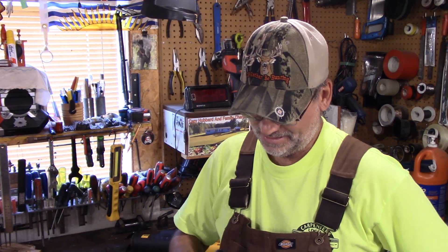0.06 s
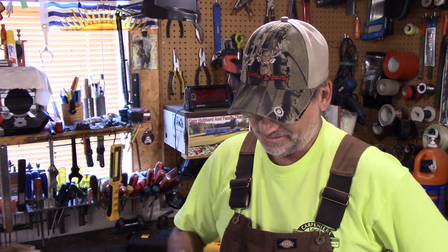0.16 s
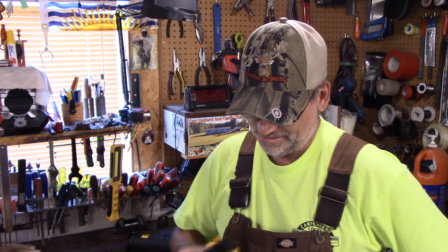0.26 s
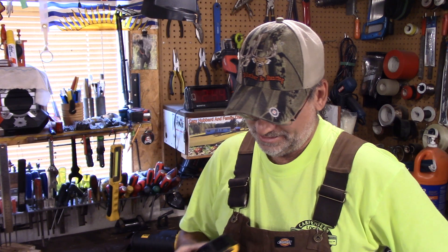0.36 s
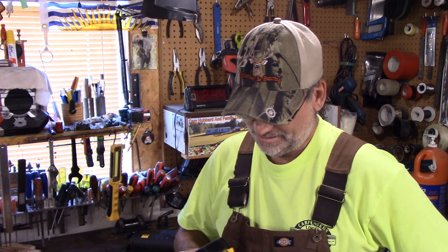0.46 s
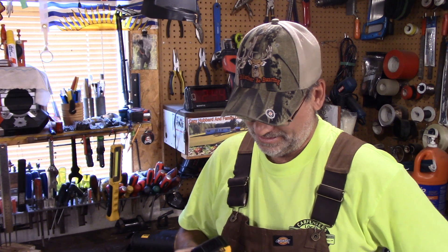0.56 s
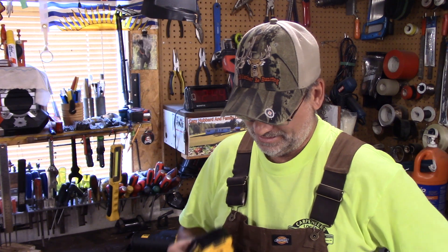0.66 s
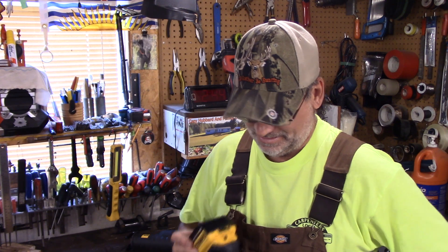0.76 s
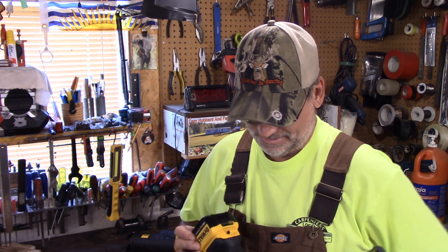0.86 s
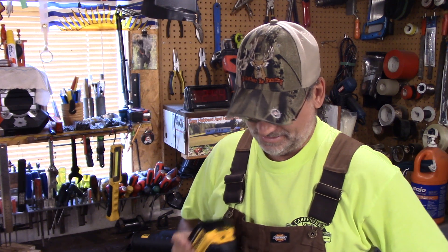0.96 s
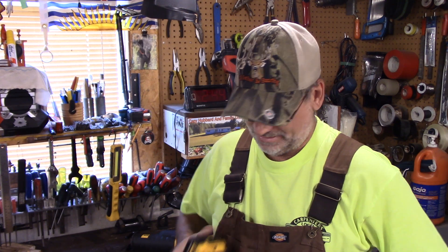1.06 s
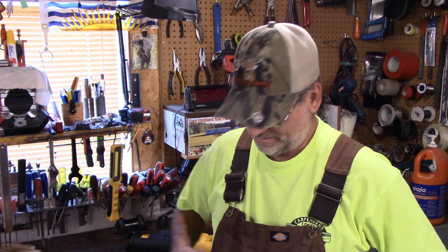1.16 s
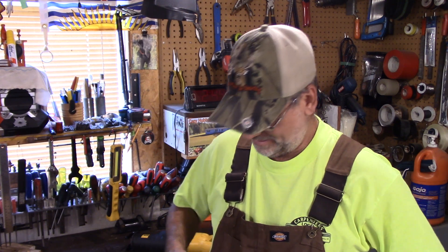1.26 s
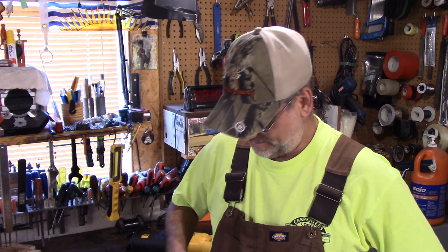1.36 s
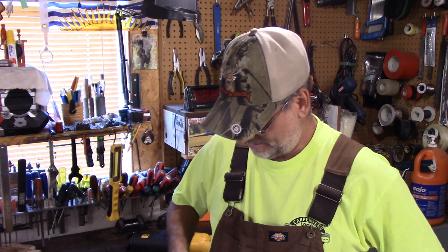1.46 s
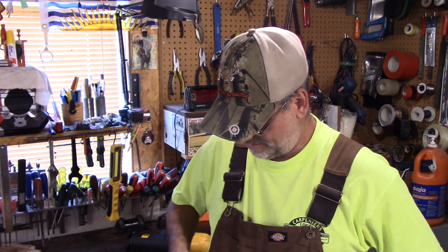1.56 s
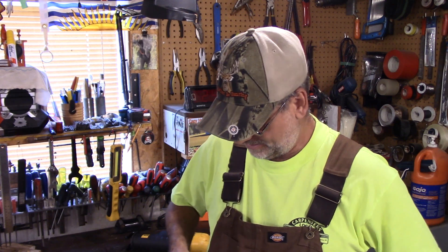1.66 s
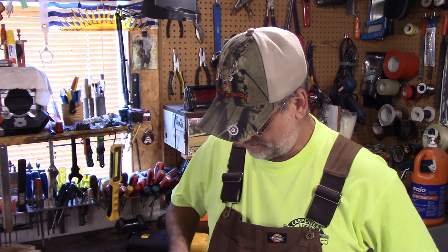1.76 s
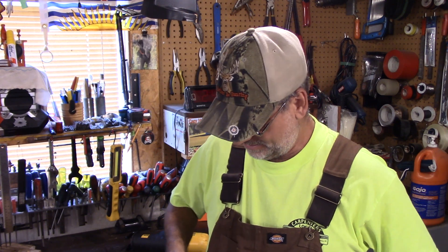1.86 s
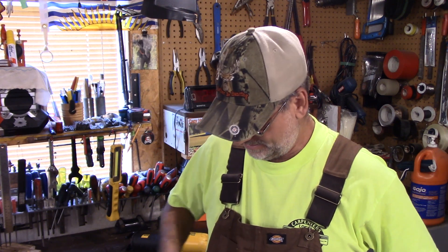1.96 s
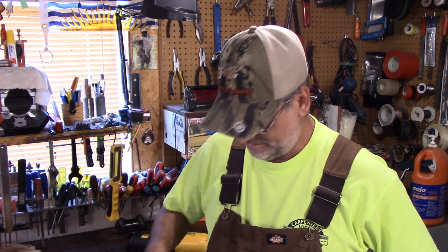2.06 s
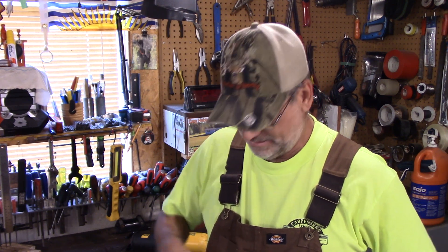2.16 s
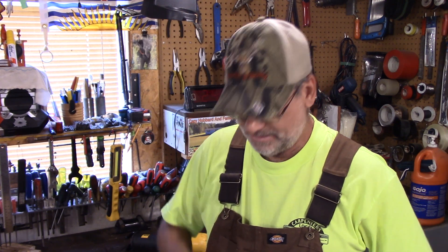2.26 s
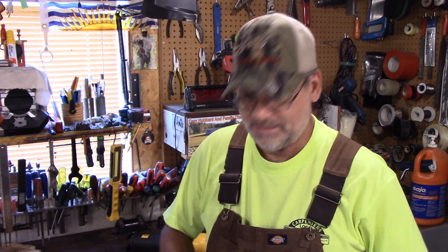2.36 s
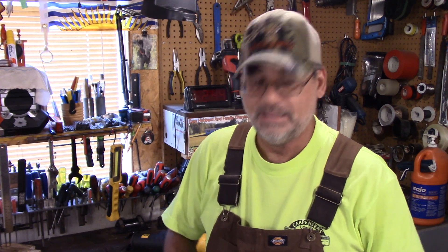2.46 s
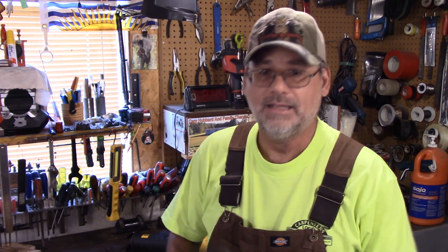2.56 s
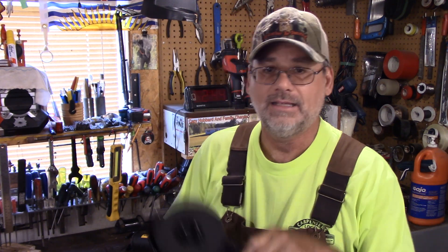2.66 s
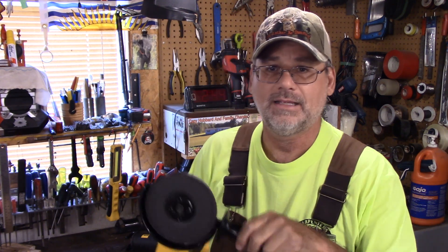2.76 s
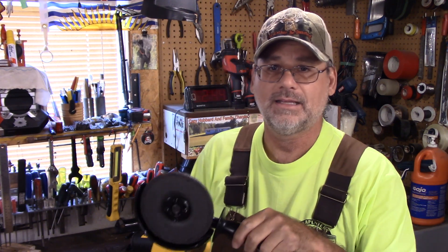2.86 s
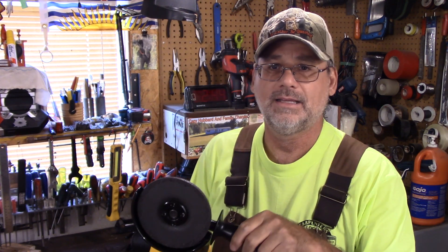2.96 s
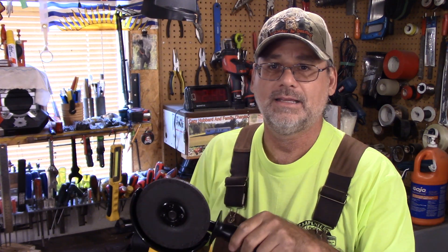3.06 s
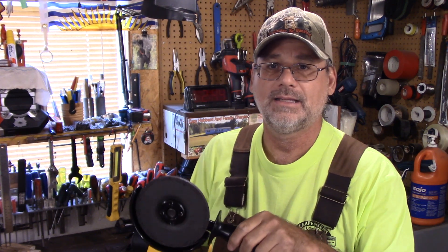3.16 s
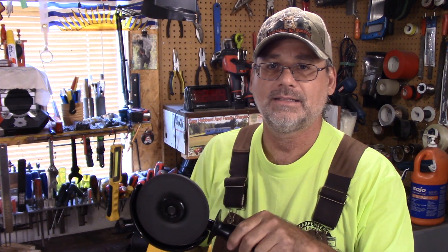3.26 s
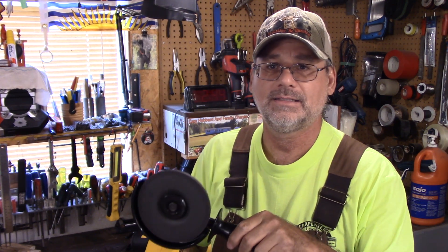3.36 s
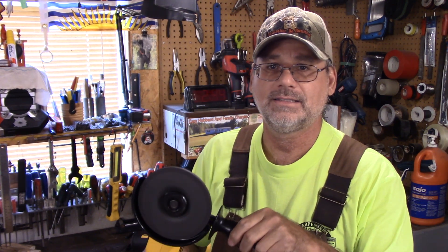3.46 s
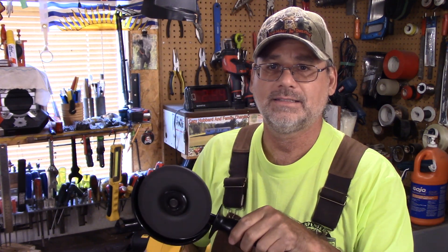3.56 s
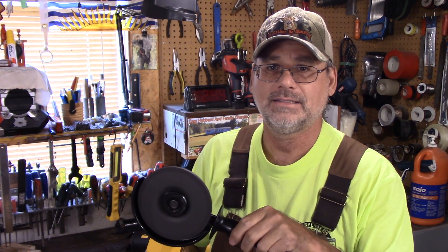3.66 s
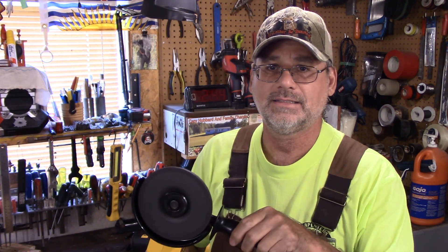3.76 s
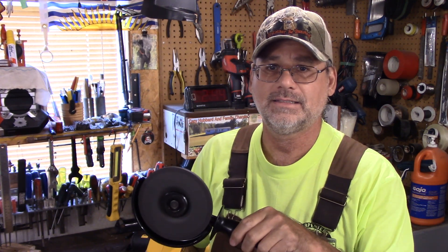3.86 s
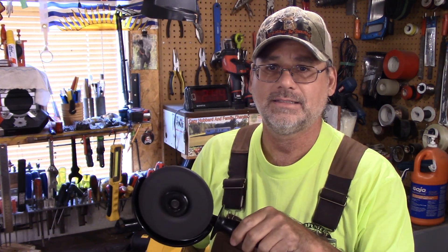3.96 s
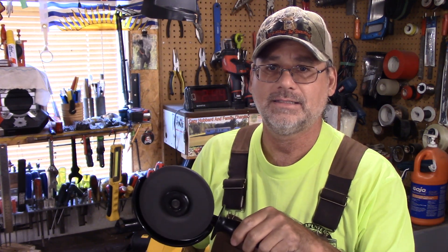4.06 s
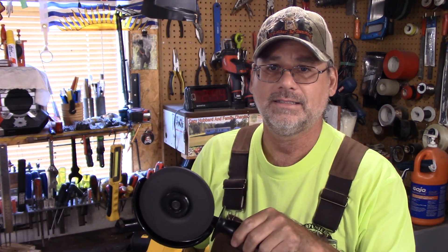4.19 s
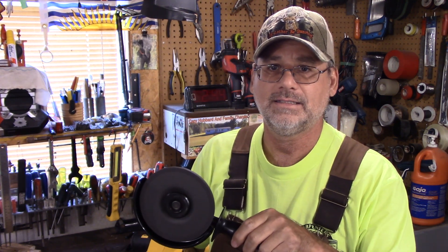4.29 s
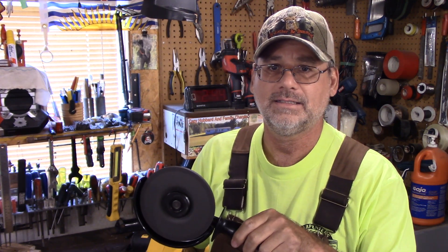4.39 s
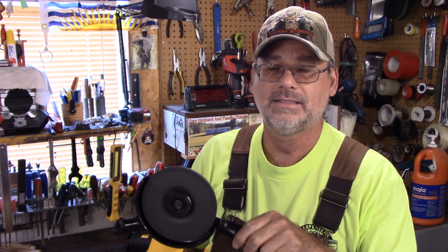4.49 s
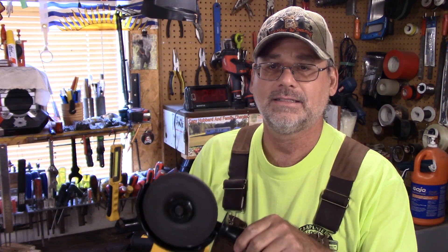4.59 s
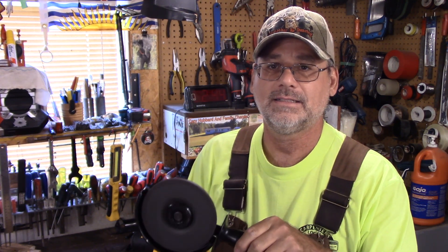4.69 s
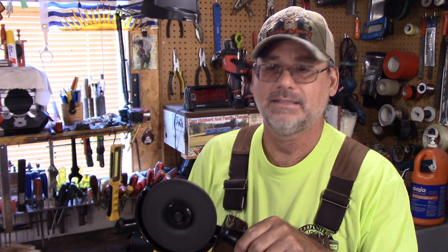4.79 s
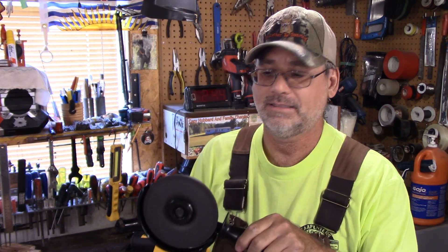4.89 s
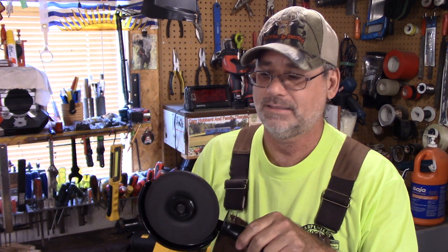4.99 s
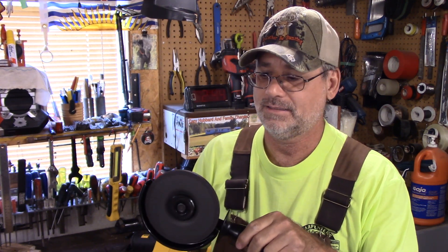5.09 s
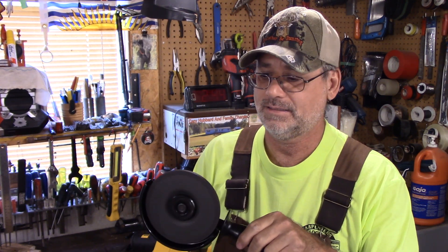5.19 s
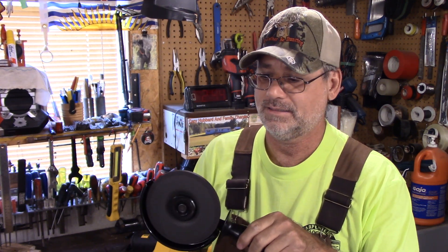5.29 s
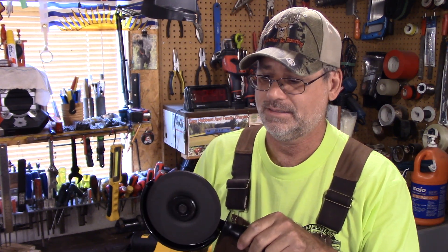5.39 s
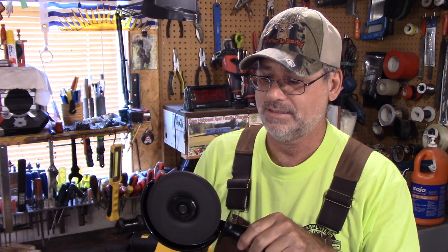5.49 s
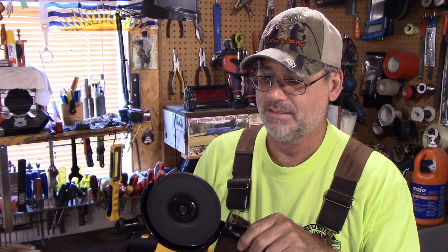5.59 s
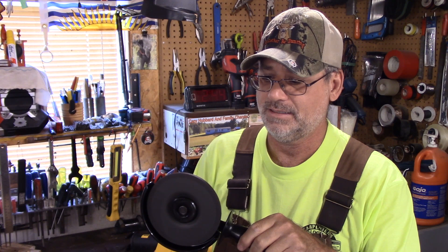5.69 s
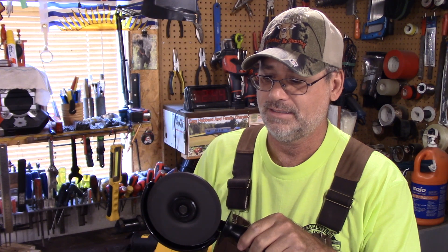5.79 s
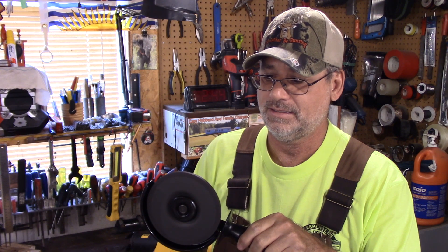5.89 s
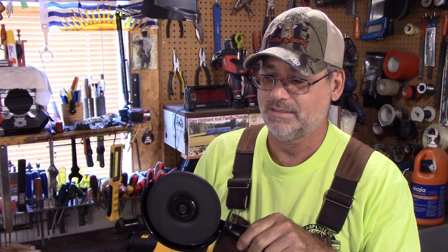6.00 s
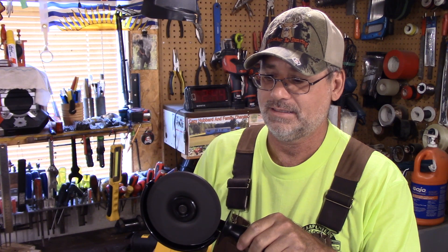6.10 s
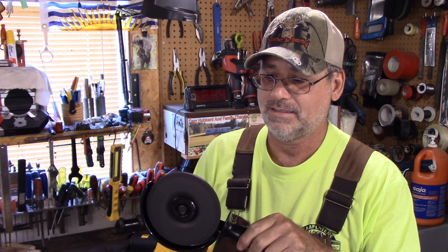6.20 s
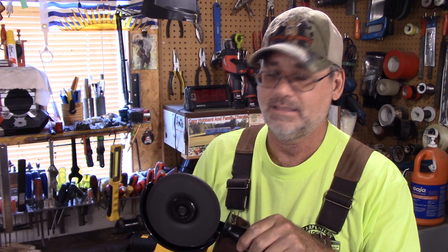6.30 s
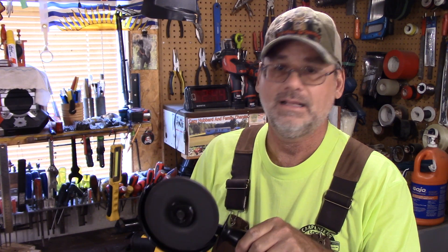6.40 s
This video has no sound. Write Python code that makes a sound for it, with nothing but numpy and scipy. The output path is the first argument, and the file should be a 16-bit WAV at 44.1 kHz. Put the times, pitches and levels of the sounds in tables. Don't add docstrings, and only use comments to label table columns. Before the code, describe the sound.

A couple of metres from a camera microphone in a small, cluttered workshop, hands rub and click a plastic power tool. A battery pack snaps home sharply. After a quieter pause, a loud switch clack starts a cordless angle grinder: a rapid rising whine, harsh gear buzz at full speed, then release and a falling, rattling coast, still turning at the end.

```python
import sys
import numpy as np
from scipy import signal
from scipy.fft import rfft, irfft, next_fast_len
from scipy.io import wavfile
from scipy.ndimage import uniform_filter1d, minimum_filter1d

SR = 44100
rng = np.random.default_rng(int(sys.argv[2]) if len(sys.argv) > 2 else 0)


def elevation(decibels):
    levels = np.asarray(decibels, float)
    return 10 ** (levels / 20)


def dump(signal):
    limited = np.clip(np.atleast_2d(signal).T, -1, 1)
    pcm = np.round(limited * 32767).astype(np.int16)
    wavfile.write(sys.argv[1], SR, pcm)


N = 284048
T = np.arange(N) / SR
SIZE = next_fast_len(N + SR)
HZ = np.arange(SIZE // 2 + 1) * SR / SIZE + 1
RELEASE_S = 4.485
TEETH = 33

# pitch_hz, width_hz, level_db
CASE = [(320.5, 9.9, -17.5), (711, 35, -11.5), (801, 193, -12), (1397, 98, -15.5), (1843.4, 105, 0),
        (2110, 170, -4.5), (2658, 240, -8.5), (2990, 180, -9)]
GUARD = [(3660, 240, -29), (3630, 55, -1), (3717, 414, -2), (4002, 154, 3.5), (4598, 246, 6.5),
         (5020, 110, -23), (5840, 110, -8)]
DISC = [(6900, 250, -15.5), (7983, 870, 0), (9690, 570, -10), (11100, 780, -9)]
# pitch_hz, level_db (per Hz)
VALLEYS = [(24, -67), (40, -20.5), (176, -36.5), (320, -16.5), (630, -13), (918, -11), (1070, -11.5),
           (1520, -10.5), (1850, -1), (3300, -10.5), (4570, 1.5), (5870, -10.5), (8130, -3), (8990, -11),
           (16000, -57)]


def curve(table):
    rows = np.array(table)
    return np.interp(T, rows[:, 0], rows[:, 1])


def unit(x):
    return x / np.sqrt(np.mean(x ** 2))


def noise():
    return rng.standard_normal(N)


def sine(turns):
    return np.sin(2 * np.pi * turns)


def step(x):
    return .5 + .5 * np.tanh(x)


def response(hz, points, peaks, valley_db):
    point_hz, point_db = np.transpose(points)
    power = elevation(2 * (np.interp(np.log(hz), np.log(point_hz), point_db) + valley_db))
    for peak_hz, width_hz, peak_db in peaks:
        power = power + elevation(2 * peak_db) / (1 + (2 * (hz - peak_hz) / width_hz) ** 2) ** 2
    return power


def colour(x, points, peaks=(), valley_db=0.):
    cepstrum = irfft(np.log(response(HZ, points, peaks, valley_db)) / 2, SIZE)
    cepstrum[1:SIZE // 2] *= 2
    cepstrum[SIZE // 2 + 1:] = 0
    gain = np.exp(rfft(cepstrum))
    return irfft(rfft(x, SIZE) * gain / np.abs(gain).max(), SIZE)[:N]


def band(x, lo_hz, hi_hz):
    sos = signal.butter(2, [lo_hz, min(hi_hz, .45 * SR)], "band", fs=SR, output="sos")
    return signal.sosfilt(sos, x)


def walk(rate):
    hold = int(SR / rate)
    levels = np.repeat(rng.standard_normal(N // 20), hold)[:N]
    return 1.3 * uniform_filter1d(uniform_filter1d(levels, hold), hold)


def burst(start_s, ring_s):
    age = np.clip(T - start_s, 0, None)
    return (1 - np.exp(-age / 0.00097)) * np.exp(-np.log(1000) * age / max(ring_s, .005))


def grinder():
    # start_s, level_db, ring_s
    jolts = [
        (3.238, -12.5, .12),
        (3.286, -9, 0.19),
        (3.35, -14.5, 0.11),
    ]
    speed, turns, coast = spindle()
    vents_db = -37.5 - 3.5 * np.log2(100 / speed) + 1.1 * walk(40)
    vents = unit(band(noise(), 7900, 17300)) * elevation(vents_db)
    shake = sum(elevation(db) * burst(start_s, ring_s) for start_s, db, ring_s in jolts)
    handle = unit(band(noise(), 725, 820)) * uniform_filter1d(shake, size=SR // 60)
    switched_on = np.clip((T - 3.236) / 0.0025, 0, 1)
    return (tones(speed, turns, coast) + gears(speed, turns, coast) + vents + handle) * switched_on


def spindle():
    # time_s, speed_turns_per_s
    run = [(3.235, 5), (3.268, 17.1), (3.3, 25.2), (3.349, 42.4), (3.402, 61.5), (3.46, 78.7), (3.5, 84.5),
           (3.54, 89.5), (3.632, 96.2), (3.76, 102), (3.868, 104.5), (4.056, 107.3), (4.48, 109),
           (4.88, 85.9), (5.2, 68.1), (5.5, 56), (5.95, 33.5), (6.44, 28)]
    load_drop_s = 0.045
    speed = uniform_filter1d(curve(run), size=SR // 40)
    return speed, np.cumsum(speed) / SR, step((T - RELEASE_S) / load_drop_s)


def tones(speed, turns, coast):
    # pitch_hz, level_db
    whine = [(480, -54), (630, -49), (690, -27.5), (800, -23.5), (880, -21.5), (1000, -17.5), (1090, -17.5)]
    # pitch_hz, width_hz, level_db
    dead_spots = [(736, 26, -8), (841, 11, -13), (1029, 7.6, -10)]
    # order (cycles per turn), full_torque_db, easing_db (per halving of torque), coast_db,
    # share (of the housing resonances, 0-1)
    orders = [
        (TEETH, -11.5, -1.8, -27, .4),
        (2 * TEETH, -15, -7, -23, .5),
        (110.5, -35, -.5, -32, .25),
        (3 * TEETH, -27, -5, -32, .6),
    ]
    # pitch_hz, half_width_hz, level_db
    loose_wheel = (2290, 310, 9.2)
    wheel_hz, wheel_width_hz, wheel_db = loose_wheel
    whine_order = 10
    full_torque = 330
    speaks_above = 27
    tight_rad, loose_rad = .45, 3.3
    loose_above, loose_span = 94.5, 2

    hz = whine_order * speed
    whine_db = np.interp(hz, *np.transpose(whine))
    for spot_hz, width_hz, db in dead_spots:
        whine_db = whine_db + db * np.exp(-((hz - spot_hz) / width_hz) ** 2)
    whine_phase = 2 * np.pi * whine_order * turns + .18 * walk(60)
    out = elevation(whine_db + .8 * walk(40)) * np.sin(whine_phase)

    driven_rad = tight_rad + (loose_rad - tight_rad) * step((speed - loose_above) / loose_span)
    coast_rad = np.clip(1.2 + 2.2 * (T - RELEASE_S), 0, 3)
    spread = (1 - coast) * driven_rad + coast * coast_rad
    pull = uniform_filter1d(np.gradient(speed) * SR, size=SR // 15)
    torque = np.clip(pull / full_torque, 1 / 16, 1)
    speaking = np.clip(speed / speaks_above, 0, 1) ** 4
    for k, (order, full_db, easing_db, coast_db, share) in enumerate(orders):
        hz = order * speed
        swell = 1 + .25 * np.cos(2 * np.pi * turns + k)
        smear = spread * (1 + min(k, 1) / 2) * walk(220)
        db = (1 - coast) * (full_db - easing_db * np.log2(torque)) + coast * coast_db
        db += share * housing_db(hz)
        db += coast * TEETH / order * wheel_db * np.exp(-((hz - wheel_hz) / wheel_width_hz) ** 2)
        level = swell * speaking * elevation(db + 1.8 * walk(90))
        out += level * np.sin(2 * np.pi * order * turns + smear)
    return np.sqrt(2) * out


def housing_db(hz):
    return 10 * np.log10(response(hz, VALLEYS, [*CASE, *GUARD, *DISC], -11))


def gears(speed, turns, coast):
    # driven_db, coast_db, slowing_db (per halving of speed), bite_share,
    # mesh_db (gained while coasting teeth stay in mesh)
    rings = [
        (-17.5, -19, -2, 0.31, 3.5),
        (-18, -15, 0.5, 1.3, 0.5),
        (-24, -12, -1.5, 1.1, -2.5),
    ]
    # time_s, level_db
    bite = [(3.24, -18), (3.27, -7), (3.34, 4.5), (3.41, -1.5), (3.5, 0.5), (3.75, 2), (4.26, -2),
            (4.45, 0), (5.0, -1.5), (5.23, -1), (5.56, 0.5), (5.96, -0.5), (6.1, 0.5), (6.44, -2)]
    # time_s, share (0-1)
    slack = [(3.2, .3), (4.42, .7), (4.52, .96), (5.45, .97), (5.6, .85), (5.82, .95), (5.96, .95),
             (5.99, .35), (6.44, .4)]
    # start_s, peak_db
    slip_times = [(4.1592, 4), (4.2677, 7), (4.298, 10), (4.4048, 5.5), (4.4753, 3)]
    two_knocks_below = 58.5

    late = turns + .05 * walk(70)
    sharp = np.clip(2.3 * (85 / speed) ** 2, 2, 4)
    swing = np.cos(2 * np.pi * late)
    knock = np.exp(sharp * (swing - 1))
    second = .1 + .75 * coast * step(two_knocks_below - speed)
    knock += second * np.exp(sharp * (-swing - 1))
    knock *= elevation(1.6 * walk(110))
    knock /= np.sqrt(uniform_filter1d(knock ** 2, size=SR // 12))
    slips = sum(elevation(db + 17.5) * burst(start_s, 0.019) for start_s, db in slip_times)

    rattle, bite_db = curve(slack), curve(bite)
    # resonances, low and high edge of the force (Hz), valley dB, share of the knock (more for higher rings)
    parts = [(CASE, 70, 3200, -8, .45), (GUARD, 3000, 6000, -6, .9), (DISC, 6000, 12000, -4, 1)]
    out = 0
    for (peaks, lo_hz, hi_hz, valley_db, share), row in zip(parts, rings):
        driven_db, coast_db, slowing_db, bite_share, mesh_db = row
        depth = rattle * share
        force = np.sqrt(1 - depth + depth * knock ** 2) + share ** 2 * slips
        impacts = noise() * elevation(2.33 * walk(300)) * force
        ring = unit(colour(band(impacts, lo_hz, hi_hz), VALLEYS, peaks, valley_db))
        coasting_db = coast_db + slowing_db * np.log2(100 / speed) + mesh_db * (1 - rattle)
        db = (1 - coast) * driven_db + coast * coasting_db + bite_share * bite_db
        out = out + ring * elevation(db + 1.4 * walk(14))
    return out


def knocks():
    # start_s, peak_db, low_db and high_db (relative to mid), shell_hz
    clicks = [(0.2377, -24, -28, -0.5, 2510), (0.2756, -16.5, 5, -13.5, 1234), (0.287, -33, 1, 1, 2300),
              (0.5094, -51, -6, 3, 1750), (0.5996, -39.5, -3, -3, 1710), (0.6824, -40, -13, -2, 2870),
              (0.774, -23.5, -8, 4, 4250), (0.802, -42, -6, -2, 3600), (1.001, -45, 2, -12, 800),
              (1.022, -45.5, 14.5, -12, 730), (1.081, -50, 12, -4, 1120), (1.316, -50, 16.5, -16, 1160),
              (1.873, -39.5, 3, -17, 1590), (1.944, -43.5, -4, -14, 870), (2.294, -29, 4.5, -6, 710),
              (2.542, -35.5, -2, -27, 1660), (2.611, -37, -30, -13, 1540), (2.784, -35, 1, -28, 833),
              (3.148, -36.5, 11, -10, 850), (3.1837, -1.5, -7, -8.5, 1600), (3.2361, 1, -6.5, -33, 1720)]
    # start_s, pitch_hz, peak_db, ring_s
    ping = (-19.5, 7000, 4.5, .01)
    # time_s, level_db
    bumps = [
        (.95, -48.5),
        (1.11, -49),
    ]
    low, mid, high = (unit(band(noise(), *hz)) for hz in [(400, 1580), (1500, 3900), (5000, 10500)])
    out = np.zeros(N)
    for start_s, db, low_db, high_db, shell_hz in clicks:
        ring_s = 0.048 * (1500 / shell_hz) ** 0.51
        note = .6 * sine(shell_hz * (T - start_s))
        click = mid + note + elevation(low_db) * low + elevation(high_db) * high
        out += elevation(db - 7.5) * burst(start_s, ring_s) * click
    start_s, spring_hz, db, ring_s = ping
    spring = unit(band(noise(), 0.94 * spring_hz, 1.02 * spring_hz))
    out += elevation(db) * burst(start_s, ring_s) * spring
    for time_s, db in bumps:
        out += elevation(db) * np.exp(-((T - time_s) / 0.02) ** 2) * sine(265 * T)
    return out


def latch():
    # start_s, peak_db
    snaps = [
        (0, -22),
        (1.631, -33),
        (1.639, -30),
        (1.6445, -2),
        (1.652, -7),
    ]
    # pitch_hz, width_hz, level_db
    shell_peaks = [(1500, 350, -4), (2000, 350, -4), (3700, 500, -7), (5400, 250, -5), (7300, 800, -11)]
    # pitch_hz, level_db (per Hz)
    shell_colour = [(59, -55), (100, -48.5), (277, -10), (328, -3.5), (621, -4), (752, -5), (1650, 2.5),
                    (4200, -13.5), (5420, -5), (16000, -52)]
    blows = sum(elevation(db) * burst(start_s, 0.028) for start_s, db in snaps[1:])
    echo = elevation(snaps[0][1] - 4.0) * burst(0, 0.2)
    shell = unit(colour(noise(), shell_colour, shell_peaks, .1))
    crack = unit(band(noise(), 3300, 22000)) * burst(snaps[3][0], 0.014)
    return blows * shell * elevation(5.5) + elevation(3.5) * crack, echo * shell


def shuffle():
    # peak_s, rise_s and fall_s (over 20 dB), rub_db, slide_db
    strokes = [(.1, 0.18, 0.082, -45, -68), (0.252, 0.04, 0.076, -35.5, -45.5),
               (.62, 0.69, 0.24, -50, -60.5), (.772, .05, 0.22, -47.5, -55), (.99, .04, 0.065, -57, -56),
               (1.21, 0.16, .25, -44, -53.5), (1.9, .03, .2, -67, -74), (2.2, 0.4, .3, -48.5, -64),
               (2.306, 0.14, 0.21, -41, -53.5), (2.682, 0.13, .15, -68, -48.5),
               (2.82, 0.73, 0.85, -48.5, -78), (3.14, 0.035, .1, -62, -73)]
    # pitch_hz, width_hz, level_db
    slide_peaks = [(3300, 980, -7.5), (5600, 250, -3), (7360, 570, -7.5), (10800, 900, -10)]
    press, glide = np.zeros(N), np.zeros(N)
    for peak_s, rise_s, fall_s, rub_db, slide_db in strokes:
        shape = elevation(-20 * np.where(T < peak_s, (peak_s - T) / rise_s, (T - peak_s) / fall_s))
        press += elevation(rub_db) * shape
        glide += elevation(slide_db) * shape
    rub = unit(band(noise(), 310, 2070)) * press * elevation(-10 + 1.8 * walk(120))
    cloth = [(1500, -24), (4000, -7), (12000, -15), (14000, -19), (16000, -33)]  # Hz, dB per Hz
    slide = unit(colour(noise(), cloth, slide_peaks))
    return rub + slide * glide * elevation(-2.5 + 1.5 * walk(150))


def room(x):
    t60_s = 0.22
    echoes = rfft(noise() * burst(0.0046, t60_s), SIZE)
    echoes /= np.sqrt(uniform_filter1d(np.abs(echoes) ** 2, size=SIZE // 300))
    return band(irfft(rfft(x, SIZE) * echoes, SIZE)[:N], 405, 9000)


def shop():
    # pitch_hz, level_db (per Hz)
    air_colour = [(15, -88), (25, -49), (114, -7), (476, -3.5), (531, -11), (624, -6.5), (887, -5.5),
                  (1400, -15.5), (1700, -10.5), (1840, -13.5), (16000, -33.5)]
    # middle_s, half_length_s, pitch_hz, level_db
    loose_metal = [(.63, 0.07, 1770, -67), (1.927, 0.11, 2860, -64), (2.587, 0.019, 1620, -51),
                   (2.868, 0.15, 1716, -60.5), (2.918, 0.058, 514, -55), (1.59, 3.1, 5600, -77)]
    air_db = -51
    mid, side = (unit(colour(noise(), air_colour)) * elevation(2.2 * walk(8.06)) for _ in range(2))
    hums = np.zeros(N)
    for middle_s, half_s, hz, db in loose_metal:
        swell = elevation(db + 5.5 * walk(44.9)) * np.exp(-((T - middle_s) / half_s) ** 4)
        hums += swell * np.sin(2 * np.pi * hz * T + 1.8 * walk(40))
    rumble, rumble_side = (unit(band(noise(), 60, 150)) for _ in range(2))
    air = elevation(air_db - 5) * mid + hums + elevation(-74.0) * rumble
    return air, elevation(air_db - 12) * side + elevation(-77) * rumble_side


def scene():
    # pitch_hz, side_minus_mid_db
    width = [(60, -30), (250, -27), (500, -27), (1000, -40), (2000, -23), (4000, -25), (8000, -23),
             (11000, -22), (15000, -20)]
    snap, echo = latch()
    hits = knocks() + snap + shuffle()
    tool = grinder()
    mid = hits + elevation(-6.5) * room(hits) + echo
    mid += elevation(0.49) * tool + elevation(-9.5) * room(tool)
    side = elevation(max(db for _, db in width)) * colour(room(mid), width)
    air, air_side = shop()
    return np.array([mid + air + side + air_side, mid + air - side - air_side])


def roll_off(x):
    return signal.sosfilt(signal.butter(12, 16500, fs=SR, output="sos"), x)


def record(dry):
    dry = signal.sosfilt(signal.ellip(8, .2, 60, 15800, fs=SR, output="sos"), dry)
    headroom = np.minimum(1, .99 / (np.abs(dry).max(axis=0) + 1e-9))
    gain = uniform_filter1d(minimum_filter1d(headroom, size=161), size=121)
    return roll_off(dry * gain)


dry = scene()
out = record(dry)
dump(out)
```